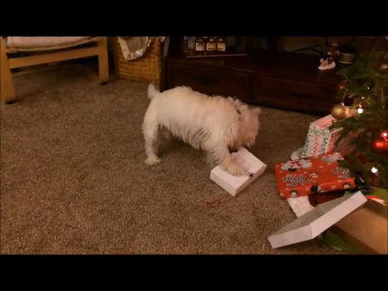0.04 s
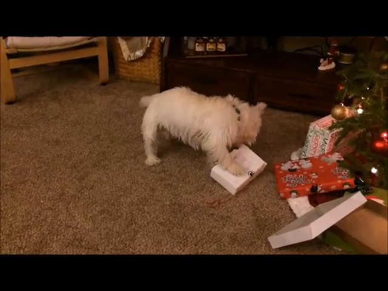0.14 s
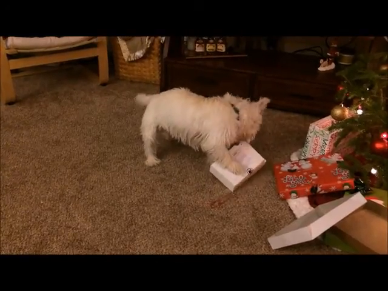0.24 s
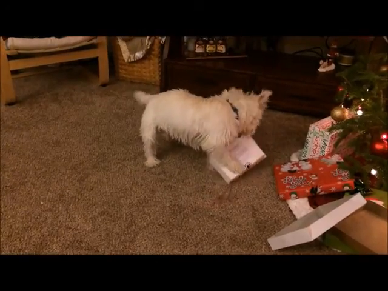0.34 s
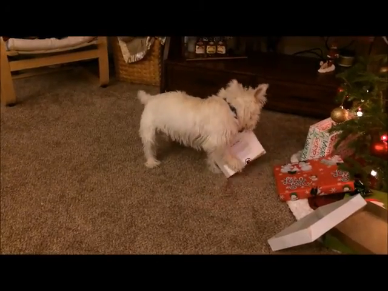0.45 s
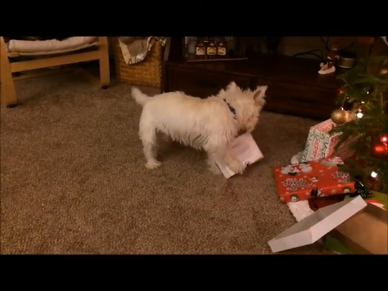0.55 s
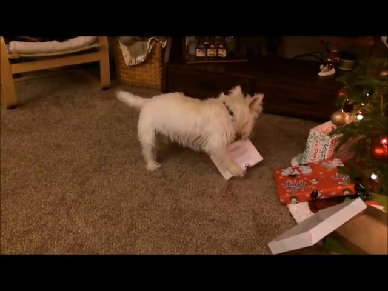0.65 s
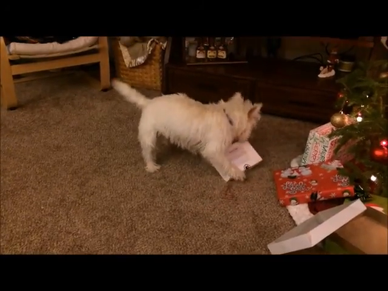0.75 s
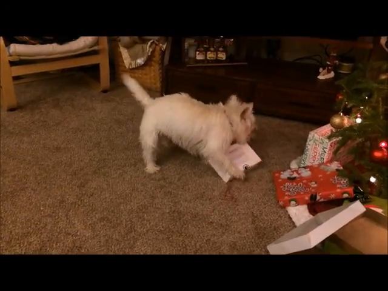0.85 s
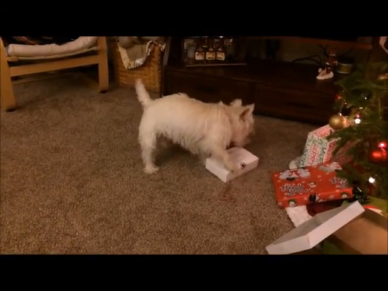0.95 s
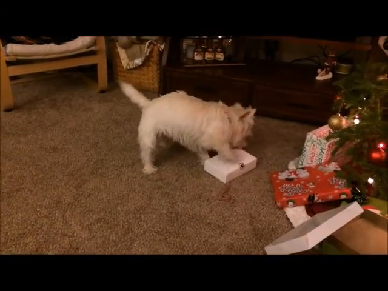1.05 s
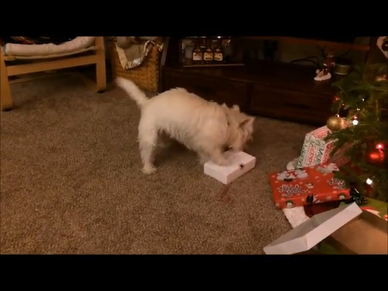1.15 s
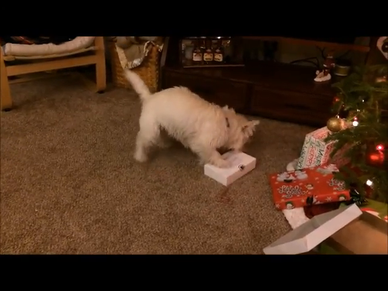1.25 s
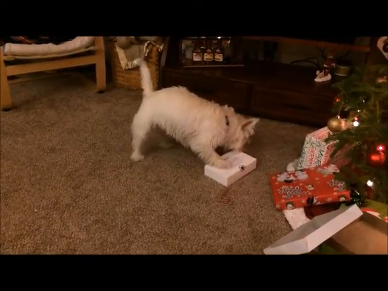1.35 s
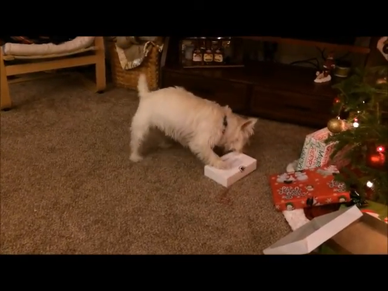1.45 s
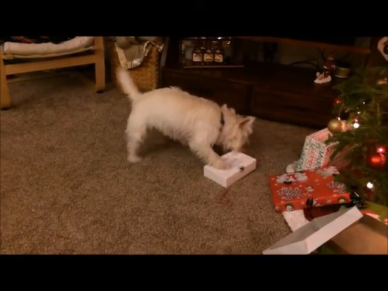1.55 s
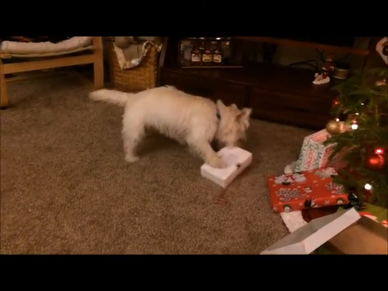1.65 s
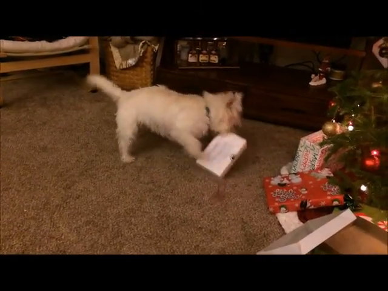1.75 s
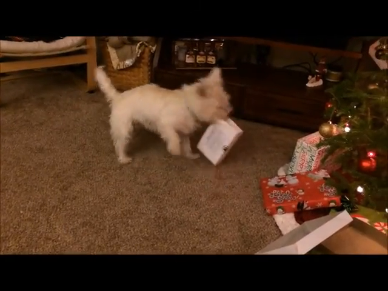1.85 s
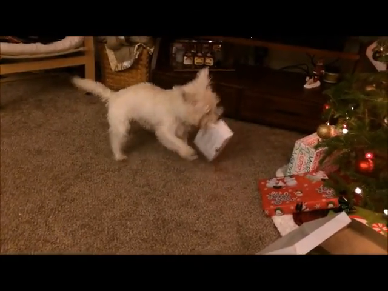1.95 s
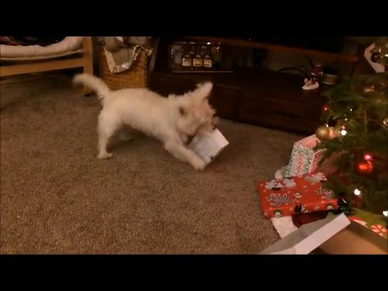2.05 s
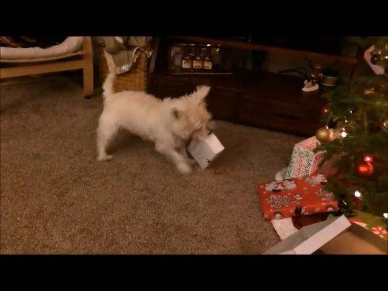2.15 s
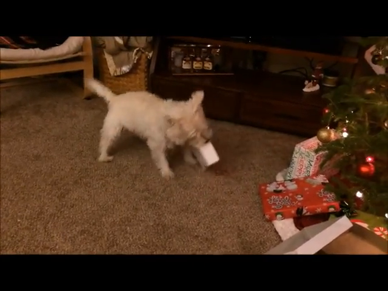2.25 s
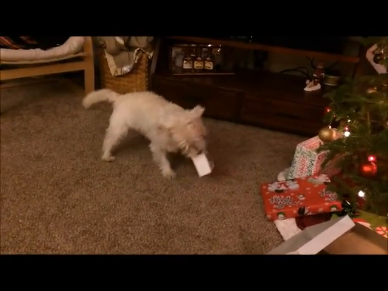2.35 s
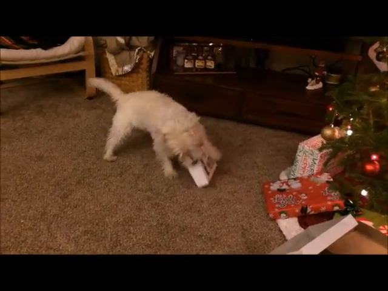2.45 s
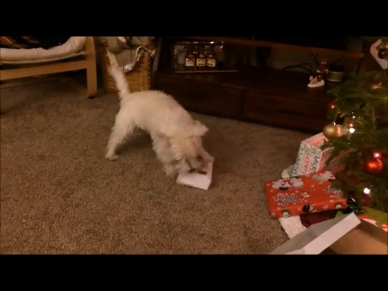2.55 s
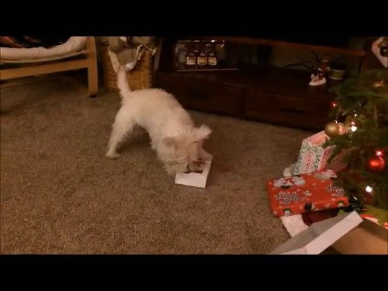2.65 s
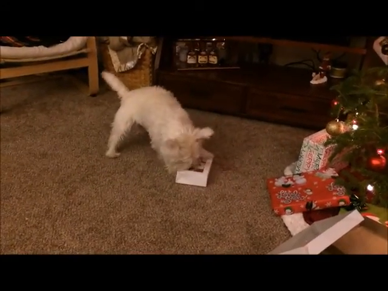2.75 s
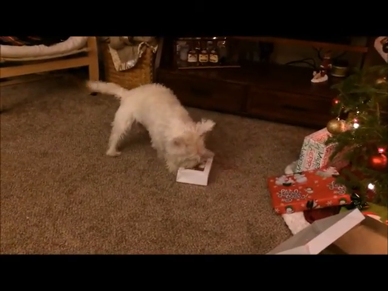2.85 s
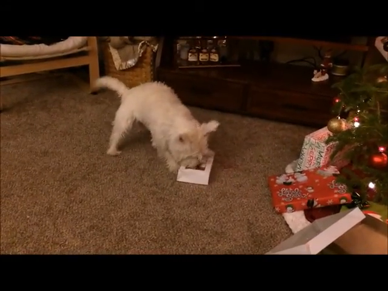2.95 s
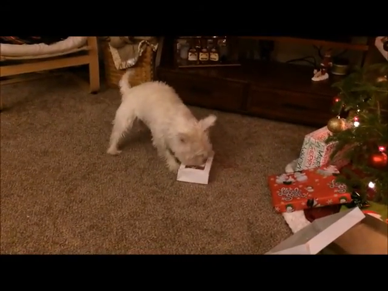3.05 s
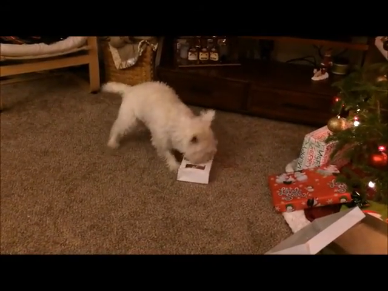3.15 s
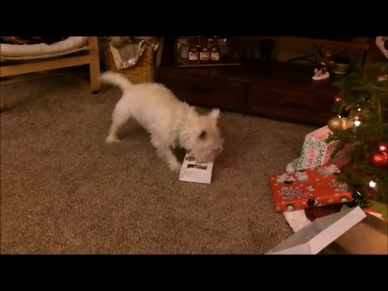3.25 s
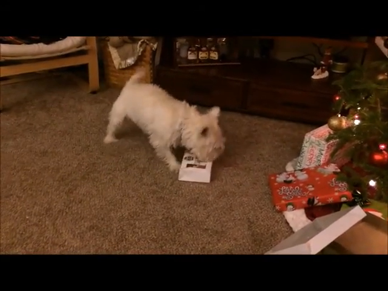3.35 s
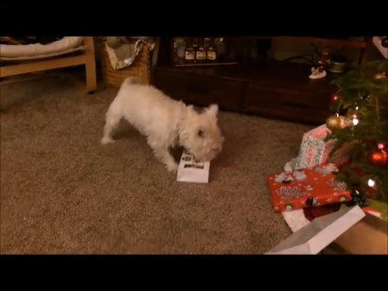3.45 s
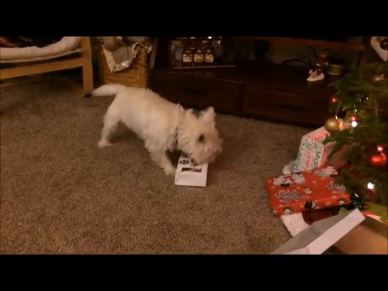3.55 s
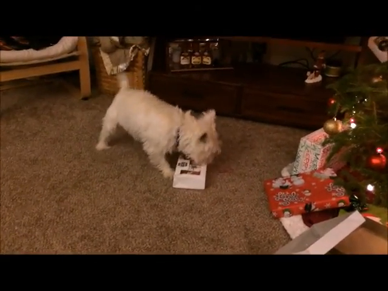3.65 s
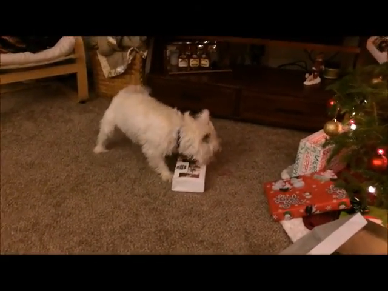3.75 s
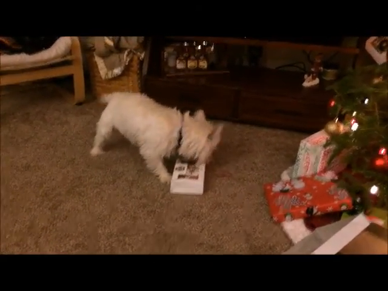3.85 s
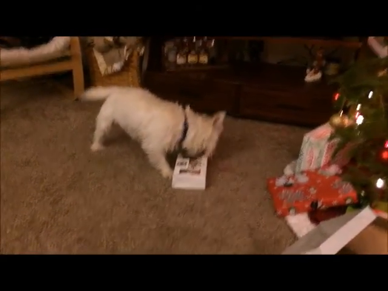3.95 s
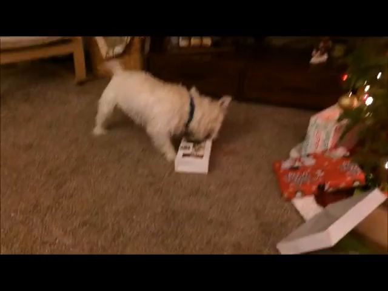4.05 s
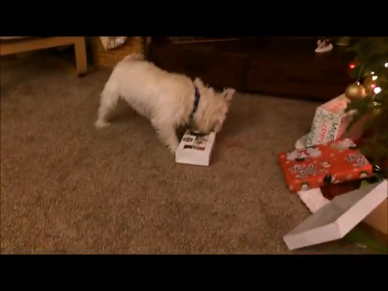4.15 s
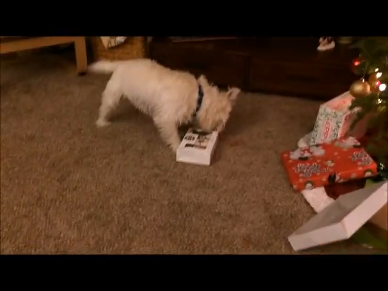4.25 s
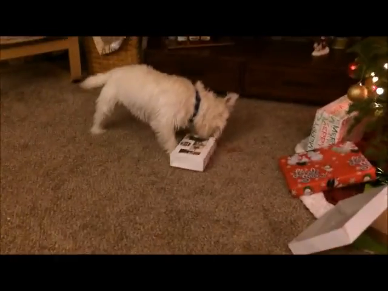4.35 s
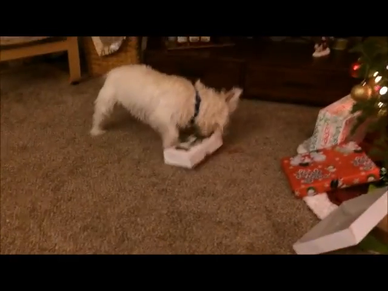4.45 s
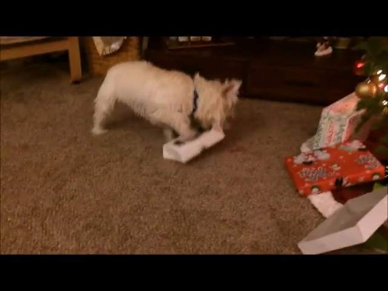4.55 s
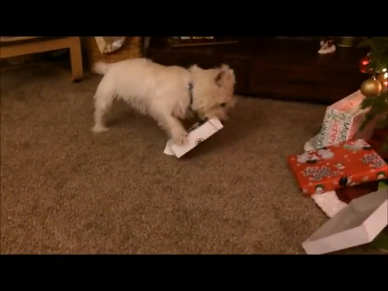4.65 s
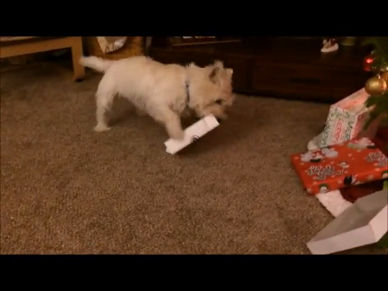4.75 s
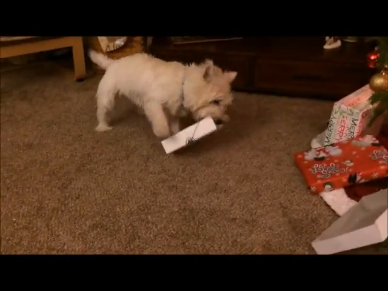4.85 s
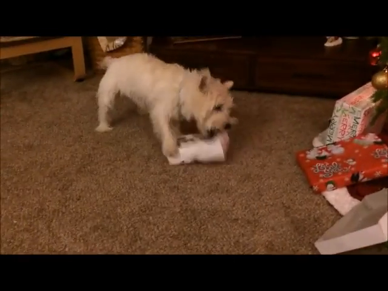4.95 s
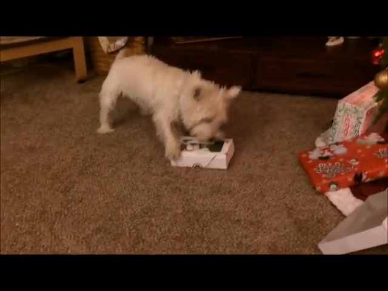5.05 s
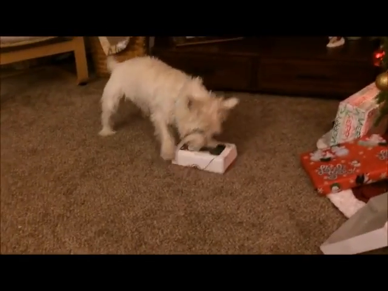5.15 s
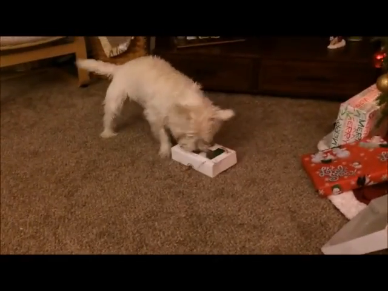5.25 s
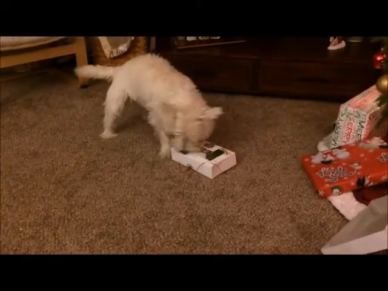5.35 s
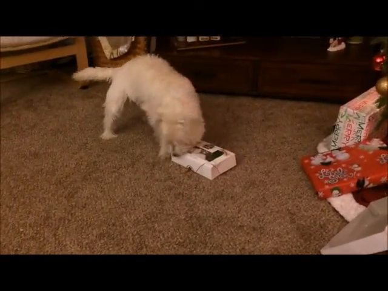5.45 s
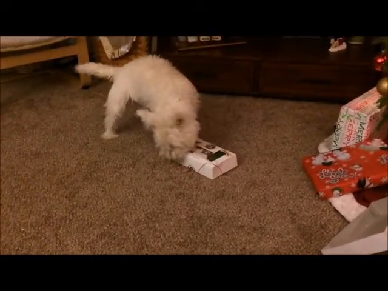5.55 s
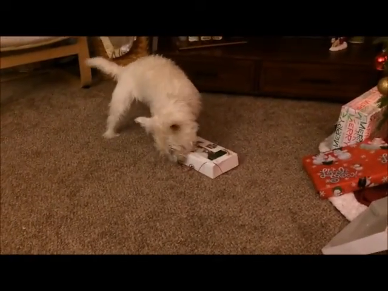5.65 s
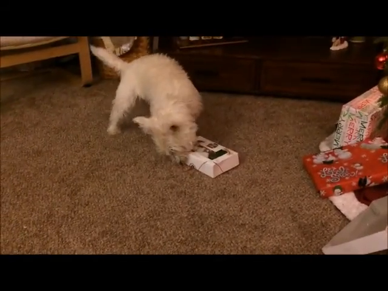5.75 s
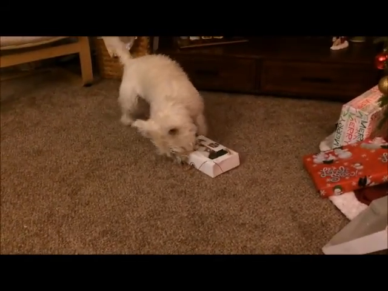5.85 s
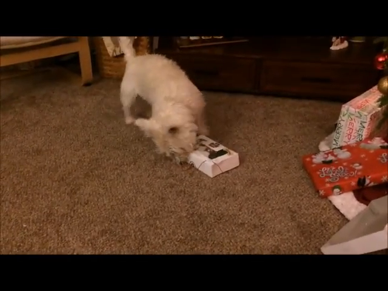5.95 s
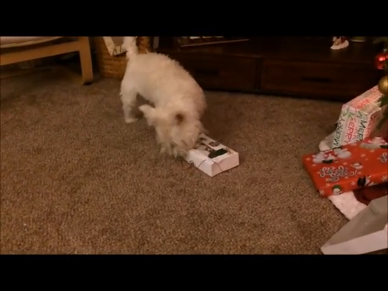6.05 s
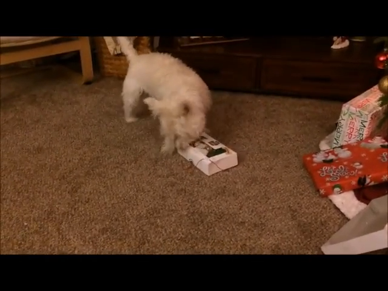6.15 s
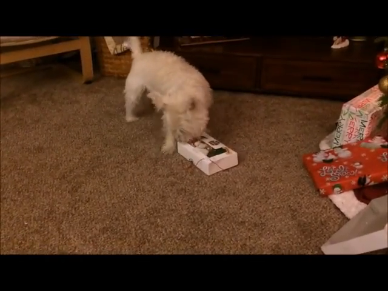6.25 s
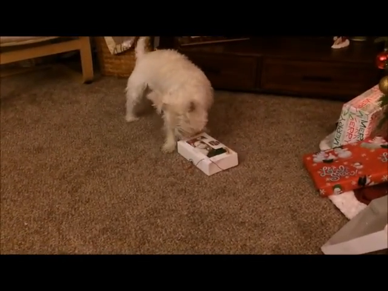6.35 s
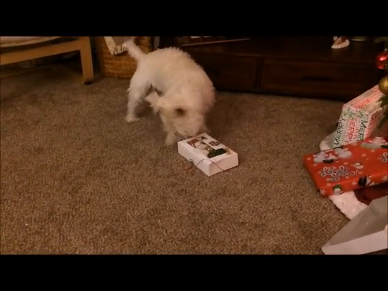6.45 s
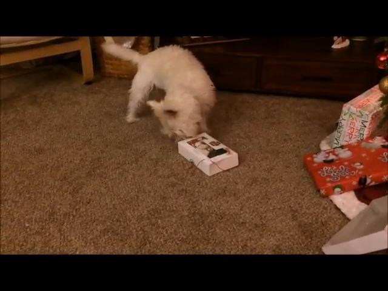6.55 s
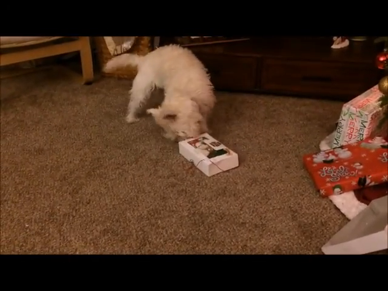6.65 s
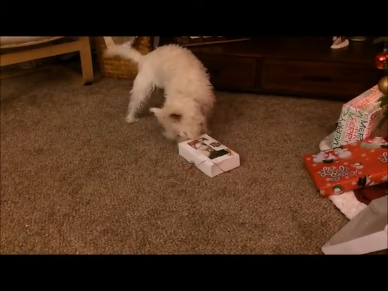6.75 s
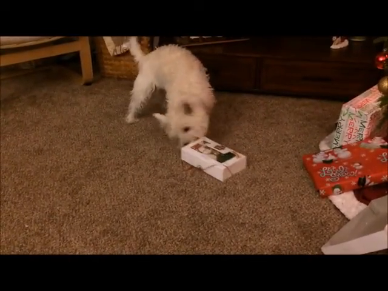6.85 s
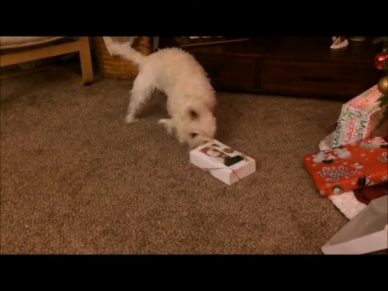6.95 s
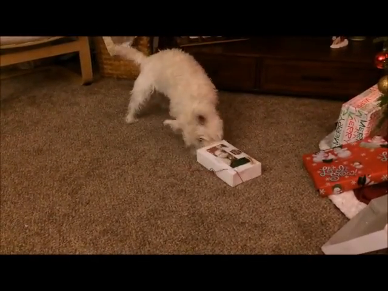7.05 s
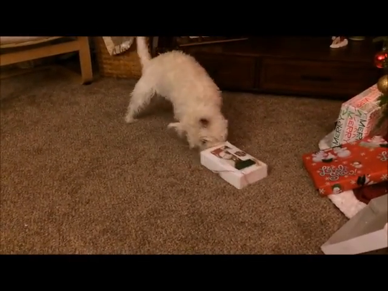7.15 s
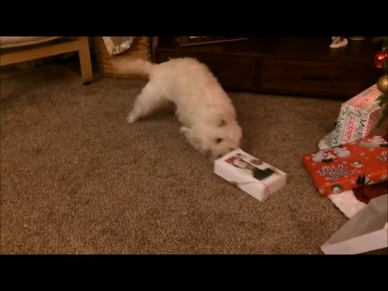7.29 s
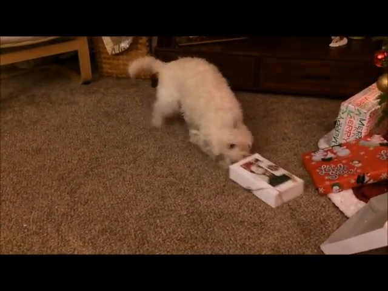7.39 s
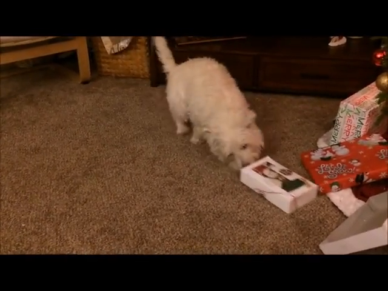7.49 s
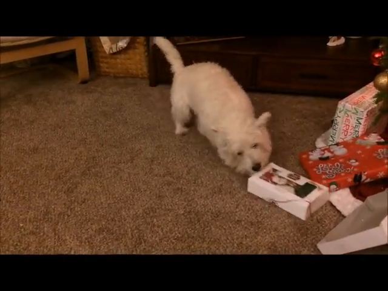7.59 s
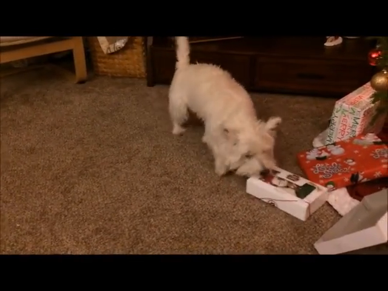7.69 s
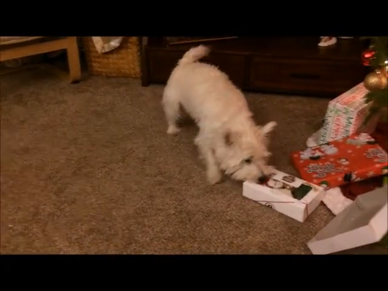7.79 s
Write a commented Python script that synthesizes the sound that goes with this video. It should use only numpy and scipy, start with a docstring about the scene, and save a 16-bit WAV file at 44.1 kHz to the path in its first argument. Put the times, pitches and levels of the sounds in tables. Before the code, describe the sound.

A light paper-covered cardboard box is pawed, bitten and pushed over carpet by a small dog. Quick scratchy scrapes and hollow thuds come first, with the heaviest bump near two seconds; then sparser ticks and bright paper snaps, another scuffle around five seconds, and a very loud close slap just before six. Afterwards only faint rustles and taps. Furnished room, short soft reverberation, close microphone, low steady hush.

```python
"""In a furnished room, a small dog paws, bites and shoves a paper-wrapped cardboard box over a carpet.
Each contact is a burst of stick-slip clicks ringing the box; thuds boom in its hollow.
Snaps and pitched ticks stand out singly, and the sliding box rubs and rustles.
One loud slap lands close by: slow pressure lobes, a crack, a rattle and a ringing panel.
Feedback delays make the room's tail, over a steady hush of filtered noise."""
import sys
import numpy as np
from scipy import signal
from scipy.fft import rfft, irfft, next_fast_len
from scipy.io import wavfile

SR = 44100
rng = np.random.default_rng(int(sys.argv[2]) if len(sys.argv) > 2 else 0)


def convert_level_to_amplitude(level_db):
    """Map a level in decibels to its linear amplitude factor."""
    exponent = np.asarray(level_db, float) / 20
    return 10 ** exponent


def master(y):
    """Save y as 16-bit WAV."""
    cut = np.clip(np.atleast_2d(y).T, -1, 1)
    pcm = np.round(cut * 32767)  # scale
    wavfile.write(sys.argv[1], SR, pcm.astype(np.int16))


N = 344844  # length in samples

# resonances of the box: mode_hz, width_hz, gain_db
BOX_MODES = [(70, 19, -0.5), (126, 80, -0.5), (205, 69, 4), (324, 123, 0.5), (416, 113, 1.5),
             (579, 58, 1.5), (707, 74, 0), (901, 173, 0.5), (977, 131, 3), (1157, 160, -1.5),
             (1353, 150, 1.5), (1600, 260, 0), (1960, 246, 2.5), (2260, 384, 2), (2900, 770, 1),
             (3500, 470, 5), (3950, 930, 1), (4940, 830, 3), (5900, 1820, 1), (7840, 2960, 1.5),
             (10330, 4000, 0), (13300, 5000, -6.5)]
# the box sliding and rustling: start_s, cardboard_rub_db, paper_rustle_db
SLIDE_LEVELS = [(0.0, -55, -75), (0.11, -67, -67), (0.35, -50, -62), (0.59, -64.5, -55.5),
                (0.74, -49.5, -58), (0.89, -63, -67), (1.13, -63, -71), (1.33, -53.5, -74),
                (1.52, -54.5, -63), (1.96, -61, -64.5), (2.2, -63, -71), (2.5, -66, -67), (2.63, -52, -58),
                (2.72, -41.5, -64.5), (3.01, -67, -69.5), (3.4, -63.5, -58), (3.85, -57, -101.5),
                (4.05, -67, -68), (4.62, -59.5, -61), (4.79, -61, -55), (5.03, -55, -69.5),
                (5.16, -36, -53), (5.23, -49, -62), (5.38, -59, -60), (5.49, -68.5, -57.5),
                (5.71, -61.5, -82), (5.92, -55.5, -61), (6.16, -79, -63), (6.32, -59, -73.5),
                (6.45, -68.5, -93.5), (6.82, -63, -74.5), (6.99, -58.5, -55), (7.08, -59.5, -57.5),
                (7.4, -57.5, -62), (7.51, -56, -53), (7.82, -58, -61)]


def rms_one(x):
    """Scale to unit rms."""
    return x / np.sqrt(np.mean(x ** 2) + 1e-20)


def coloured(spectrum):
    """Steady noise shaped by a (Hz, dB) spectrum; rms 1."""
    size = next_fast_len(N)
    hz = np.arange(1, size // 2 + 2) * SR / size
    points_hz, db = np.transpose(spectrum)
    shape = convert_level_to_amplitude(np.interp(np.log(hz), np.log(points_hz), db))
    white = rng.standard_normal(size)
    return rms_one(irfft(rfft(white) * shape, size)[:N])


def grains(per_s, spread_db):
    """Stick-slip clicks of uneven size and either sign at random moments; rms 1."""
    sizes = convert_level_to_amplitude(spread_db * np.minimum(rng.exponential(1, N), 4))
    signs = rng.choice([-1, 1], N)
    happens = rng.random(N) < per_s / SR
    return rms_one(sizes * signs * happens)


def resonate(x, hz, width_hz):
    """Two-pole resonance, gain close to 1 at its peak."""
    r = np.exp(-np.pi * width_hz / SR)
    zeros = [(1 - r * r) / 2, 0, (r * r - 1) / 2]
    poles = [1, -2 * r * np.cos(2 * np.pi * hz / SR), r * r]
    return signal.lfilter(zeros, poles, x + 1e-18)


def body(drives):
    """Each mode of the box rings with its own drive, neighbours in opposite sign."""
    out = np.zeros(N)
    for k, ((hz, width_hz, db), drive) in enumerate(zip(BOX_MODES, drives)):
        out = out + (-1) ** k * convert_level_to_amplitude(db) * resonate(drive, hz, width_hz)
    return out


def across_modes(reach, parts_db):
    """Blend the levels of the box's parts into a drive for every mode, dull to bright; last axis = modes."""
    hz, drive_db, part = np.transpose(reach)
    log_modes = np.log(np.array(BOX_MODES)[:, 0])
    drive_db = np.interp(log_modes, np.log(hz), drive_db)
    part = np.interp(log_modes, np.log(hz), part)
    count = np.shape(parts_db)[1]
    # a fractional part number shares a mode between two neighbouring parts
    weights = np.array([np.interp(part, np.arange(count), one) for one in np.eye(count)])
    return drive_db + parts_db @ weights


def fade(t60, rise_s):
    """A quick rise and an exponential fall by 60 dB over t60 seconds."""
    t = np.arange(int(np.clip(t60, .01, .6) * SR)) / SR
    return (1 - np.exp(-t / max(rise_s, 1e-4))) * convert_level_to_amplitude(-60 * t / max(t60, .01))


def add(track, s, piece):
    """Mix a piece into a track at time s."""
    i = int(np.clip(round(s * SR), 0, N - 1))
    track[..., i:i + piece.shape[-1]] += piece[..., :N - i]


def stroke(hold_s):
    """A rubbing stroke rises, sags while held, then dies faster and faster."""
    rise_s, swell_share = 0.0004, .12  # longer strokes swell in over this share of their hold
    sag_db_per_s, release_s, release_bend = 60, 0.062, 1.63
    hold_s = max(hold_s, 0)
    t = np.arange(int((hold_s + release_s) * SR)) / SR
    swell = 1 - np.exp(-t / (rise_s + swell_share * hold_s))
    release_db = 43.6 * (np.maximum(t - hold_s, 0) / release_s) ** release_bend
    return swell * convert_level_to_amplitude(-sag_db_per_s * t - release_db)


def contacts():
    """Dense slips plus a few coarse ones; every contact shakes each mode with a strength of its own."""
    # paw, teeth and carpet on the box: start_s, hold_s, panel_db, edge_db, paper_db
    touches = [(0, 0.01, -54.5, -70, -69), (0.109, 0.0033, -49.5, -55, -68),
               (0.152, 0.012, -43, -45.5, -56.5), (0.173, 0.047, -37.5, -39.5, -61.5),
               (0.29, 0.015, -33, -36, -57), (0.3716, 0.036, -38, -45, -69),
               (0.4286, 0.035, -38, -43.5, -56), (0.4934, 0.025, -39, -45, -53),
               (0.526, 0.022, -49.5, -53, -59), (0.645, 0.0045, -40.5, -51, -64),
               (0.736, 0.031, -41, -48, -54), (0.794, 0.039, -38, -47, -54),
               (0.8534, 0.0031, -28, -37, -41.5), (1.0414, 0.0074, -48.5, -74, -64),
               (1.078, 0.015, -51, -57.5, -59), (1.107, 0.016, -49.5, -65, -62),
               (1.144, 0.013, -58, -58, -61), (1.248, 0.003, -55, -69, -73),
               (1.2923, 0.0036, -31.5, -36, -45.5), (1.319, 0.013, -42, -49, -50.5),
               (1.359, 0.0035, -45, -55, -58), (1.433, 0.003, -54, -58, -61),
               (1.5, 0.0033, -52, -52.5, -62), (1.64, 0.024, -49, -47, -59),
               (1.817, 0.027, -53.5, -49.5, -61.5), (2.166, 0.019, -41.5, -42, -43),
               (2.178, 0.0087, -40, -40, -52), (2.21, 0.01, -50, -46, -53.5),
               (2.244, 0.023, -46.5, -55.5, -51.5), (2.367, 0.003, -54, -63, -79),
               (2.4253, 0.051, -49.5, -52.5, -55.5), (2.5077, 0.003, -48, -50.5, -42),
               (2.615, 0.011, -32, -37, -30), (2.652, 0.0084, -51, -44, -44),
               (2.687, 0.0027, -45, -43.5, -36.5), (2.7515, 0.0063, -44, -44.5, -44),
               (2.895, 0.0063, -56.5, -51.5, -53), (3.063, 0.0045, -60, -66, -58.5),
               (3.163, 0.02, -69, -60, -61), (3.297, 0.033, -58, -70, -60.5),
               (3.344, 0.0034, -44, -48.5, -64), (3.46, 0.0033, -54, -59, -55),
               (3.647, 0.092, -52.5, -60, -61), (3.777, 0.029, -58.5, -57, -55),
               (4.102, 0.024, -56, -62, -65), (4.165, 0.017, -55.5, -66, -60),
               (4.262, 0.028, -60, -61, -50.5), (4.4287, 0.0045, -55, -52, -39),
               (4.518, 0.003, -60, -65, -51.5), (4.579, 0.043, -43.5, -45.5, -50),
               (4.739, 0.022, -34.5, -37.5, -44.5), (4.791, 0.003, -49, -48, -57),
               (4.9757, 0.065, -46, -47, -48), (5.0735, 0.018, -35.5, -43.5, -50),
               (5.116, 0.027, -41, -45, -42.5), (5.148, 0.013, -38.5, -32, -47),
               (5.163, 0.023, -38.5, -39.5, -37.5), (5.204, 0.003, -53, -46, -51),
               (5.335, 0.046, -51, -59.5, -51.5), (5.614, 0.003, -53.5, -65, -66),
               (5.662, 0.036, -63, -65, -62), (5.717, 0.039, -53.5, -58.5, -57.5),
               (5.785, 0.038, -51, -58, -59), (6.204, 0.014, -58.5, -61, -59),
               (6.247, 0.005, -52, -63, -64), (6.2606, 0.016, -49, -48, -51.5),
               (7.3235, 0.024, -46.5, -49, -52.5), (7.355, 0.038, -76, -51, -59),
               (7.498, 0.02, -51.5, -50.5, -56), (7.72, 0.027, -55, -52.5, -50.5)]
    # how a contact reaches the modes: mode_hz, drive_db, leading_part (0 panel, 1 edge, 2 paper)
    contact_reach = [(150.3, 7.5, -0.1), (850, 14.5, 0), (1600, 8, 0.26), (2800, 8, 1.35), (4500, 8, 1.45),
                     (8160, 5.5, 1.98)]
    rows = np.array(touches)
    slips = grains(6000, spread_db=3.5) + 0.8 * grains(350, spread_db=2.5)
    mode_db = across_modes(contact_reach, rows[:, 2:])
    mode_db = mode_db + rng.normal(0, 1.3, mode_db.shape)
    shake = np.zeros((len(BOX_MODES), N))
    for row, db in zip(rows, mode_db):
        add(shake, row[0], convert_level_to_amplitude(db)[:, None] * stroke(row[1]))
    return body(shake * slips)


def thuds():
    """A soft push sets the air in the box ringing and gives the floor one low shove."""
    # the box dropped or pressed on the carpet: start_s, level_db, pitch_hz
    pushes = [(0.107, -40.5, 328), (0.174, -27.5, 266), (0.197, -28, 336), (0.299, -28.5, 246),
              (0.32, -34, 334), (0.376, -34, 347), (0.401, -47, 183), (0.65, -44, 350), (0.747, -30.5, 240),
              (0.811, -36, 330), (0.857, -26, 278), (0.903, -39, 175), (1.085, -32, 200),
              (1.104, -28.5, 271), (1.145, -32, 211), (1.291, -31, 254), (1.325, -30, 396),
              (1.374, -33, 295), (2.173, -16.5, 219), (2.219, -27.5, 222), (2.429, -40.5, 321),
              (2.509, -33.5, 169), (2.617, -23.5, 243), (2.641, -35.5, 129), (2.69, -29.5, 350),
              (2.757, -25, 205), (2.82, -37, 198), (4.114, -39.5, 210), (4.608, -38.5, 205),
              (4.746, -28.5, 218), (4.761, -35, 163), (5.073, -37, 157), (5.163, -27.5, 204),
              (5.209, -27.5, 177), (5.353, -37.5, 171), (6.261, -51, 213), (7.33, -38, 177)]
    thud_cycles = 15.1  # cycles until a thud has died by 60 dB
    out = np.zeros(N)
    phases = rng.uniform(0, 2 * np.pi, (len(pushes), 2))
    for (s, db, hz), phase in zip(pushes, phases):
        shape = fade(thud_cycles / hz, rise_s=0.00094)
        turn = 2 * np.pi * np.arange(len(shape)) / SR
        tones = np.sin(hz * turn) + 0.4 * np.sin(1.426 * hz * turn + phase[0])
        tones = tones + 0.23 * np.sin(75 * turn + phase[1])  # the floor
        # a panel mode that dies sooner
        tones = tones + 0.31 * shape * np.sin(2.69 * hz * turn + phase.sum())
        add(out, s, convert_level_to_amplitude(db) * shape * tones)
    return out


def snaps():
    """A release of tension: a fast-dying cycle when low, more cycles when bright, the front slightly rounded."""
    # loud single snaps of paper and claw: start_s, peak_db, centre_hz
    loud_snaps = [(0.1097, -35, 1400), (0.159, -31, 1600), (0.1761, -25, 1500), (0.188, -27, 1490),
                  (0.1998, -21, 1400), (0.2936, -28, 1600), (0.305, -21, 1300), (0.3136, -20, 1200),
                  (0.3223, -24, 1600), (0.379, -26, 1490), (0.4052, -27, 1400), (0.648, -29, 1300),
                  (0.7529, -26, 2200), (0.8601, -22, 1130), (1.2533, -35.5, 1300), (1.293, -14, 2800),
                  (1.3688, -31, 1100), (1.4321, -37, 2630), (1.6495, -39, 2350), (2.2176, -33, 2900),
                  (2.5134, -43, 6700), (2.6548, -38, 6600), (2.69, -24, 8700), (2.763, -25, 1830),
                  (2.9348, -34.5, 2900), (3.4654, -28.5, 9000), (3.6625, -39, 3500), (3.7995, -33, 4500),
                  (4.1923, -36.5, 5840), (4.2841, -28.5, 3400), (4.2912, -29, 5900), (4.428, -20.5, 9500),
                  (4.4322, -20.5, 10700), (4.4415, -16, 6160), (4.5183, -25, 11400), (4.5351, -31, 9200),
                  (4.7485, -36, 1400), (4.8075, -37, 3750), (5.082, -39, 1100), (5.0015, -39, 3500),
                  (5.0202, -22, 2340), (5.12, -22, 5500), (5.2075, -32, 3000), (6.1971, -39, 5170),
                  (7.336, -34.5, 3730), (7.51, -38, 3500), (7.5644, -37, 3660)]
    # faint snaps come by chance, standing above the paper rustle of the moment
    faint_count, above_db, spread_db, low_hz, high_hz = 70, 15, 2.5, 1500, 8000
    out = np.zeros(N)
    when, size, pitch = rng.random((faint_count, 3)).T
    when_s = when * N / SR
    levels = np.array(SLIDE_LEVELS)
    rustle_db = np.interp(when_s, levels[:, 0], levels[:, 2])
    faint_db = rustle_db + above_db - spread_db * np.log(1 - size * .95)
    faint_hz = low_hz * (high_hz / low_hz) ** pitch
    faint = np.transpose([when_s, faint_db, faint_hz])
    for s, db, hz in [*loud_snaps, *faint]:
        cycles = np.arange(int(8.0 * SR / hz)) * hz / SR
        front = 1 - np.exp(-cycles / .06)
        decay = np.exp(-1.6 * cycles * (2000 / hz) ** .5)
        wave = front * decay * np.cos(2 * np.pi * (cycles - .1))
        add(out, s, -convert_level_to_amplitude(db) * wave / np.abs(wave).max())
    return out


def ticks():
    """Ticks and rasps: a short puff of noise through one resonance, applied twice."""
    # claws or teeth on a taut spot: start_s, level_db, pitch_hz, width_hz, t60_s
    taut_spots = [(.178, -31, 1500, 1100, .22), (.298, -29, 1500, 1200, .1), (.38, -34, 1500, 1200, .15),
                  (.434, -31, 1100, 500, .14), (.5, -32, 1000, 400, .2), (.522, -29, 1000, 350, .12),
                  (1.108, -36, 620, 300, .07), (2.25, -38, 600, 250, .08), (3.352, -20, 620, 250, .06),
                  (3.352, -23, 900, 400, .05), (3.394, -37, 620, 200, .06), (3.19, -46, 3100, 700, .07),
                  (3.432, -42, 2430, 600, .1), (4.263, -28, 2800, 800, .06), (4.263, -28, 4200, 1400, .045),
                  (4.439, -26, 1150, 550, .05), (6.84, -33, 1850, 750, .08), (6.99, -41, 2450, 350, .16),
                  (7.169, -33, 1250, 550, .06), (7.336, -34, 3600, 3000, .07),
                  (7.51, -35, 4500, 3500, .035), (7.735, -43, 1790, 300, .06)]
    out = np.zeros(N)
    noises = rng.standard_normal((len(taut_spots), SR // 4))
    for (s, db, hz, width_hz, t60), noise in zip(taut_spots, noises):
        shape = fade(t60, rise_s=0.0012)
        rung = rms_one(resonate(resonate(noise, hz, width_hz), hz, width_hz))
        add(out, s, convert_level_to_amplitude(db - 6) * shape * rung[-len(shape):])  # the rms lies under the peak
    return out


def slide():
    """Carpet fibres rub the box unevenly: the grip wavers for all modes together and a little for each."""
    # how the rubbing reaches the modes: mode_hz, drive_db, paper_share (0-1)
    slide_reach = [(189, 16.0, 0.5), (800, 15, 0.2), (2800, 7, 0.4), (9000, 4, .95)]
    s, cardboard_db, paper_db = np.transpose(SLIDE_LEVELS)
    steps = np.arange(0, N + 700, 700)  # samples
    grip_db = 1.7 * rng.standard_normal(len(steps))
    grip_db = grip_db + 1.2 * rng.standard_normal((len(BOX_MODES), len(steps)))
    parts_db = np.transpose([np.interp(steps / SR, s, db) for db in (cardboard_db, paper_db)])
    level_db = across_modes(slide_reach, parts_db).T + grip_db
    rub = grains(9000, spread_db=-0.5)
    return body([np.interp(np.arange(N), steps, convert_level_to_amplitude(db)) * rub for db in level_db])


def slap():
    """Air pushed to and fro in slow lobes, a hard crack, a rattle dying away and a panel ringing on."""
    # slow pressure lobes: start_s, height (1 = full scale), length_s
    lobes = [(5.914, 0.04, 0.014), (5.927, -0.24, 0.0067), (5.935, 0.19, 0.0048), (5.9368, 0.41, 0.0028),
             (5.9379, -0.12, 0.011)]
    # colour of crack and rattle: freq_hz, relative density_db (per Hz)
    slap_colour = [(150, -35), (250, -10), (570, -3), (1300, -6), (1900, -8), (3080, -5), (5000, -10),
                   (12300, -13), (15700, -17)]
    slap_s, crack_db, rattle_db, ring_db = 5.937, -5.5, -18, -11
    out, ring = np.zeros(N), np.zeros(N)
    colour = coloured(slap_colour)
    for s, height, length_s in lobes:
        add(out, s, height * np.hanning(int(length_s * SR)))
    crack = fade(.012, rise_s=.0001) * colour[:int(.012 * SR)]
    add(out, slap_s, convert_level_to_amplitude(crack_db) * crack)
    # the rattle's treble dies first
    dull_fade = fade(.3, rise_s=0.0072)
    bright_fade = fade(.26, rise_s=0.0031)
    noise = colour[SR:SR + len(dull_fade)]
    dull = signal.sosfilt(signal.butter(2, 5000, fs=SR, output="sos"), noise)
    bright = (noise - dull)[:len(bright_fade)]
    add(out, slap_s, convert_level_to_amplitude(rattle_db) * dull_fade * dull)
    add(out, slap_s, convert_level_to_amplitude(rattle_db) * bright_fade * bright)
    # the panel: fading noise through a resonance
    add(ring, slap_s, convert_level_to_amplitude(ring_db) * fade(.42, rise_s=0.0049))
    return out + resonate(ring * rng.standard_normal(N), 570, 180)


def room(x):
    """Sixteen feedback delays, duller on every round, smeared by a dense scatter of early echoes."""
    t60_s, wall_cut_hz = .45, 9000  # t60 of the lows; the treble dies sooner
    size = next_fast_len(N + SR)
    bins = np.arange(size // 2 + 1)
    turn = -2j * np.pi * bins / size
    dull = 1 / (1 + (bins * SR / size / wall_cut_hz) ** 2) ** 0.067
    lags = (rng.uniform(.012, 0.046, 16) * SR).astype(int)
    tail = 0
    for k, lag in enumerate(lags):
        loop = convert_level_to_amplitude(-60 * lag / SR / t60_s) * dull * np.exp(turn * lag)
        tail = tail + (-1) ** k * loop / (1 - loop)
    for lag in (47, 131, 223):  # samples
        tail = tail * (np.exp(turn * lag) - .6) / (1 - 0.52 * np.exp(turn * lag))
    return irfft(rfft(x, size) * tail, size)[:N]


def hush():
    """Room and microphone noise: a steady, bass-heavy noise at a fixed level."""
    # colour of the hush: freq_hz, relative level_db
    hush_colour = [(15, -54.5), (25, -16), (43, -1), (64, -5.5), (86, -12), (133, -1.5), (221, -12.5),
                   (297, -12), (445, -17), (762, -21.5), (848, -28), (15500, -32.5)]
    return convert_level_to_amplitude(-64.5) * coloured(hush_colour)


def scene():
    """Box, slap, their room sound (soft furnishings keep no boom) and the steady hush."""
    box = contacts() + thuds() + ticks() + snaps()
    blow = slap()
    wet = room(convert_level_to_amplitude(-28) * box + convert_level_to_amplitude(-39) * blow)
    wet = signal.sosfilt(signal.butter(2, 190, "high", fs=SR, output="sos"), wet)
    return (box + blow + wet + slide() + hush())[None]


def top_cut(x):
    """Nothing passes above the cut-off."""
    return signal.sosfilt(signal.butter(12, 16550, fs=SR, output="sos"), x)


def record(dry):
    """A steep low-pass drops the top away and peaks stop near full scale."""
    low_pass = signal.cheby2(12, 26, 15800, fs=SR, output="sos")  # 26 dB down from 15800 Hz up
    mix = np.clip(signal.sosfilt(low_pass, dry), -.97, .97)
    return top_cut(mix)


dry = scene()
out = record(dry)
master(out)
```